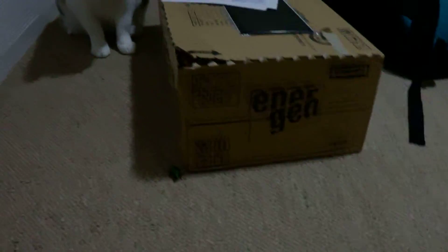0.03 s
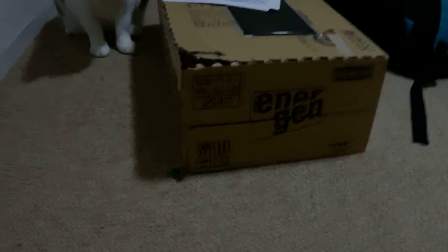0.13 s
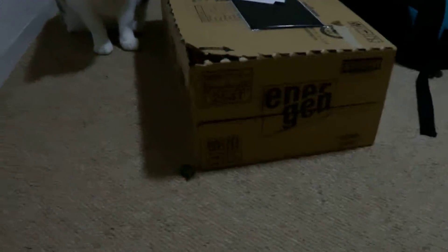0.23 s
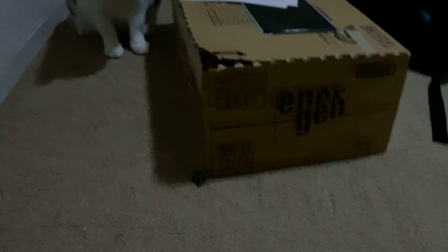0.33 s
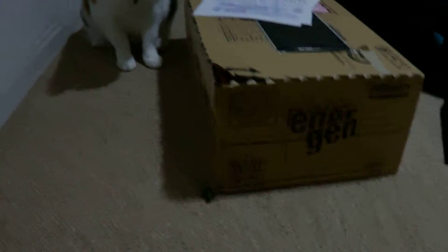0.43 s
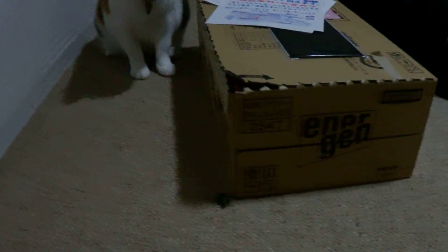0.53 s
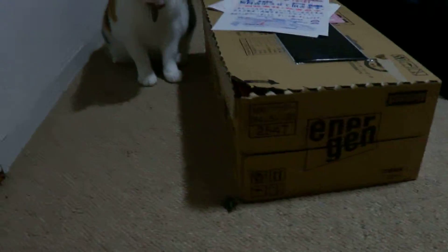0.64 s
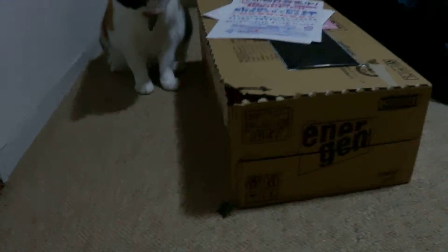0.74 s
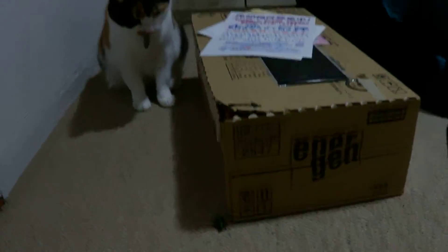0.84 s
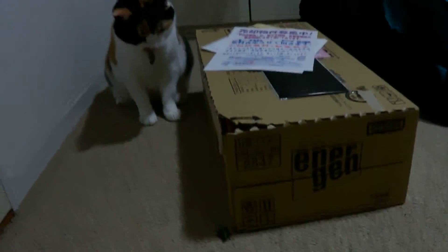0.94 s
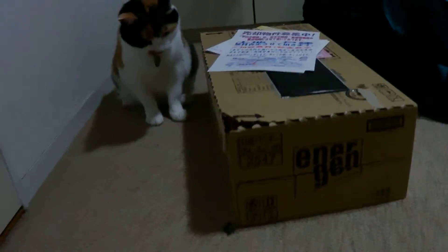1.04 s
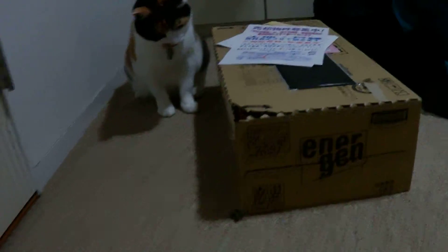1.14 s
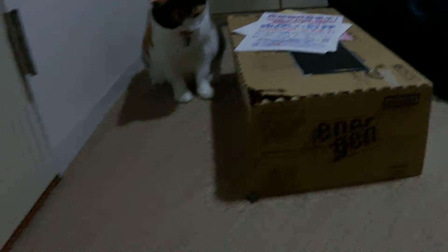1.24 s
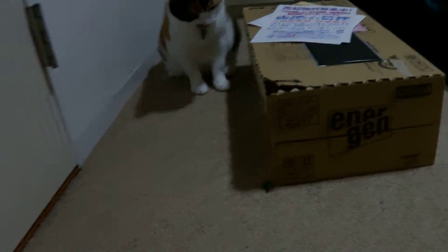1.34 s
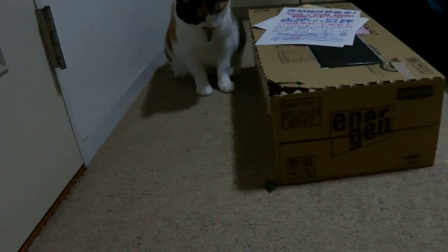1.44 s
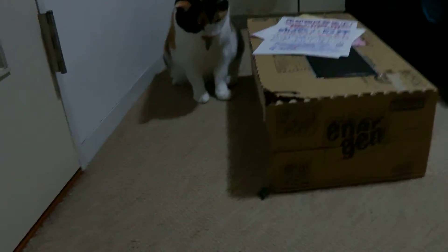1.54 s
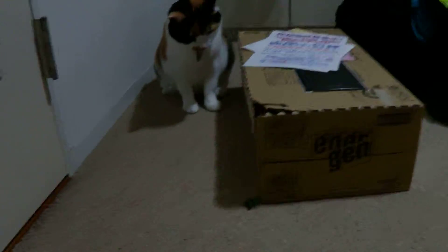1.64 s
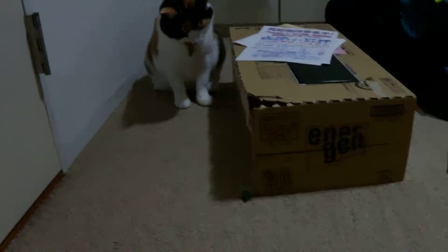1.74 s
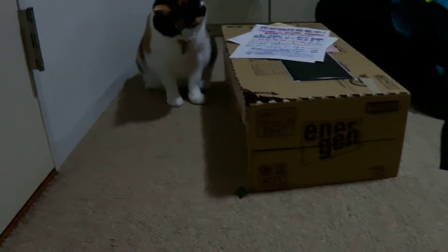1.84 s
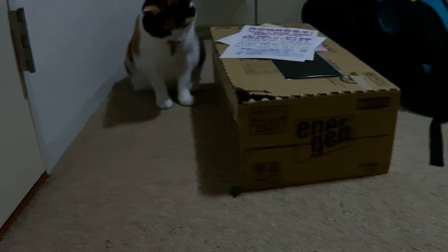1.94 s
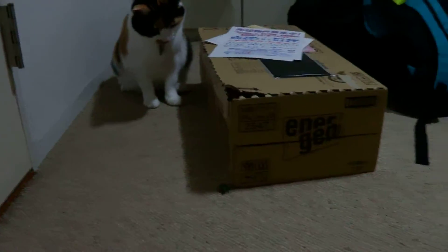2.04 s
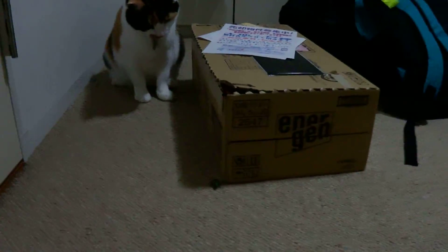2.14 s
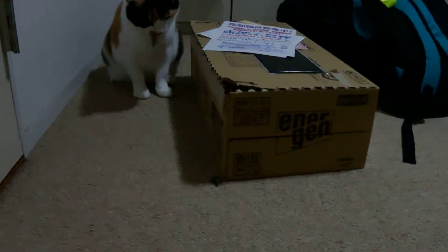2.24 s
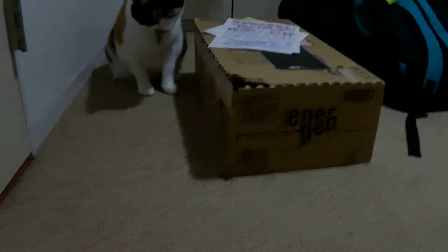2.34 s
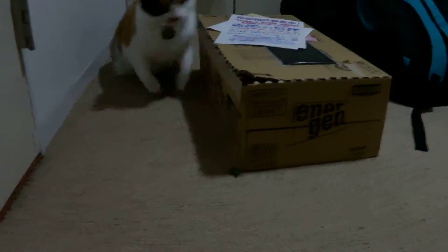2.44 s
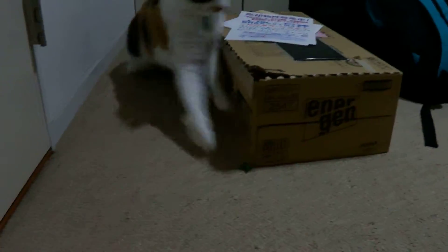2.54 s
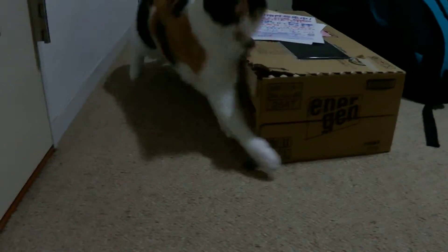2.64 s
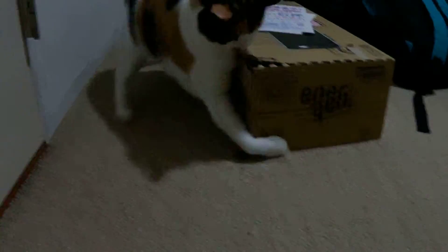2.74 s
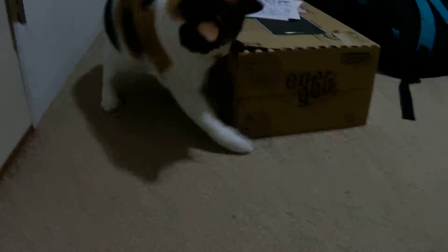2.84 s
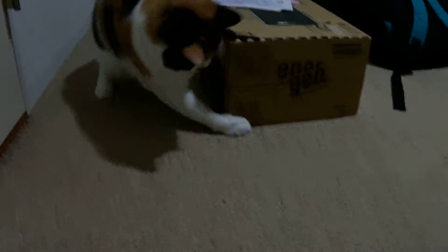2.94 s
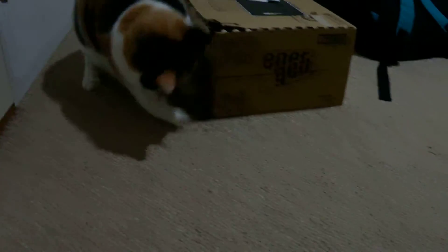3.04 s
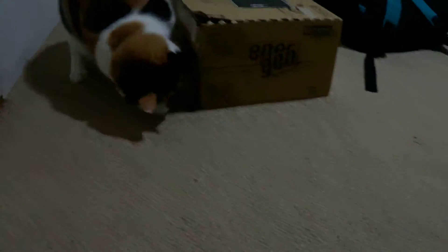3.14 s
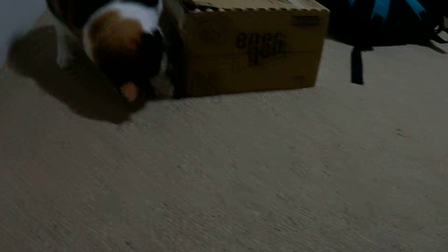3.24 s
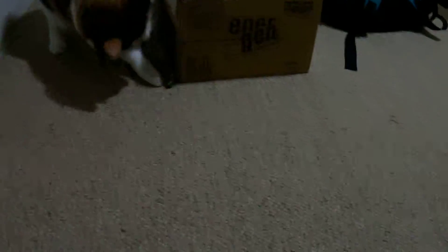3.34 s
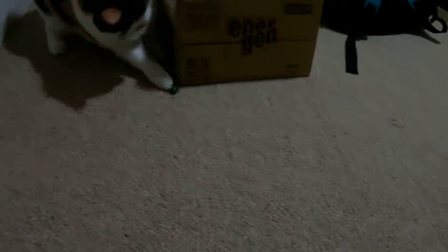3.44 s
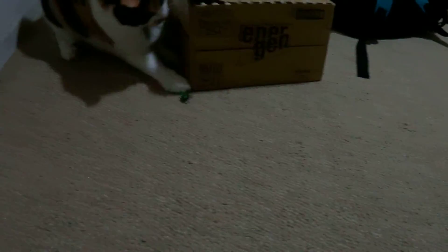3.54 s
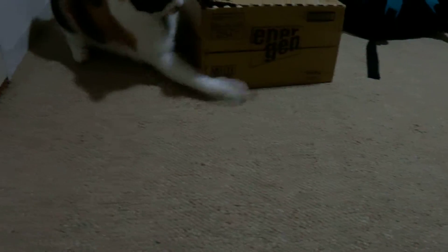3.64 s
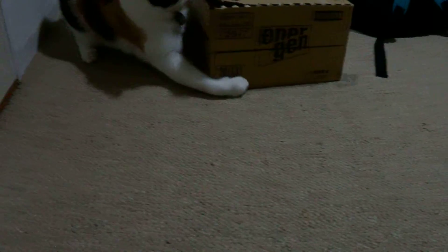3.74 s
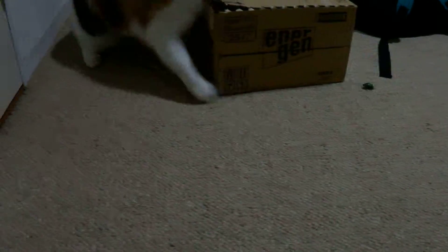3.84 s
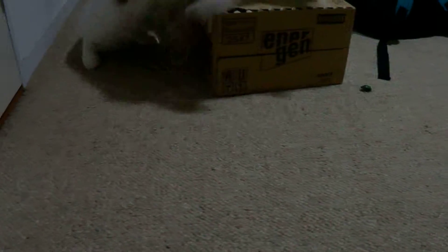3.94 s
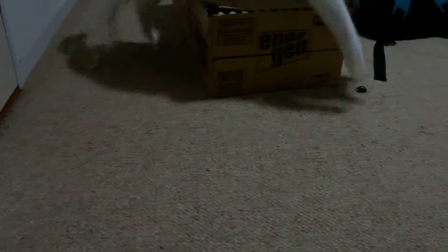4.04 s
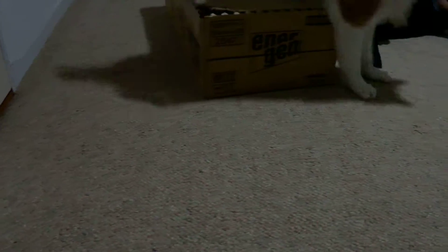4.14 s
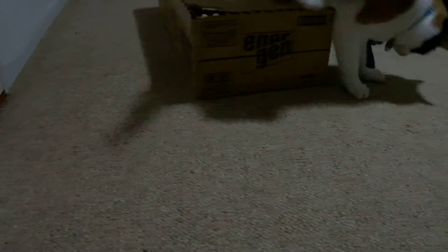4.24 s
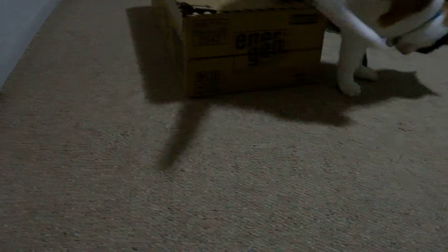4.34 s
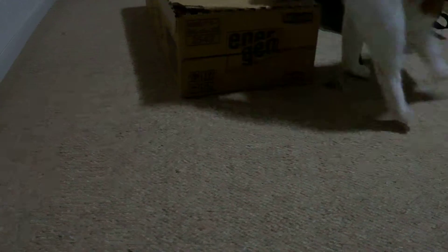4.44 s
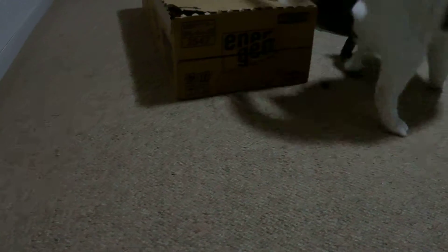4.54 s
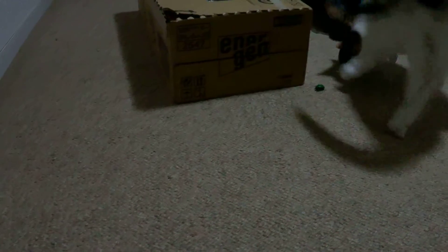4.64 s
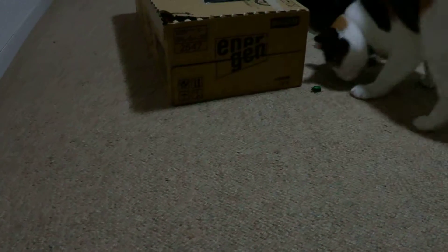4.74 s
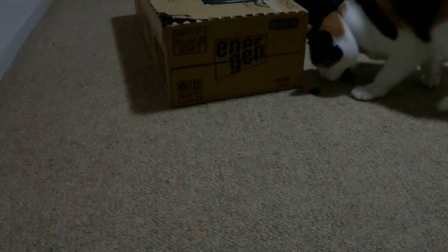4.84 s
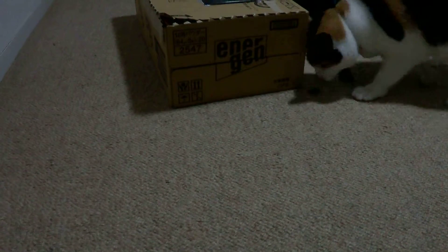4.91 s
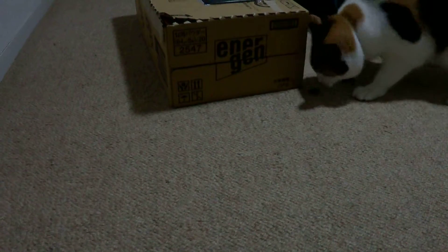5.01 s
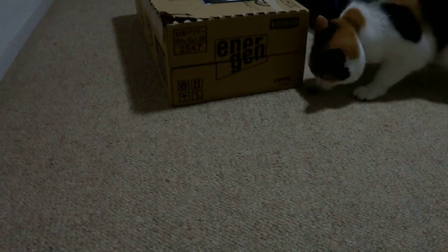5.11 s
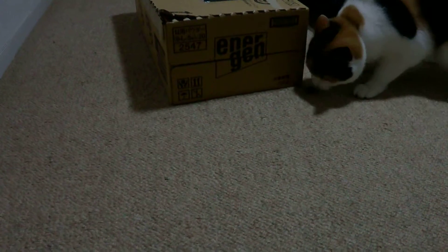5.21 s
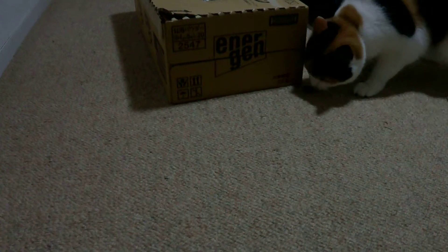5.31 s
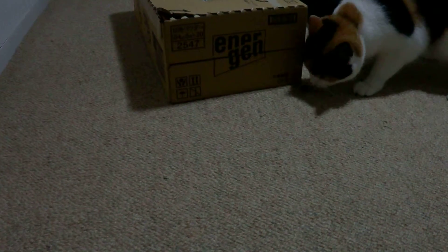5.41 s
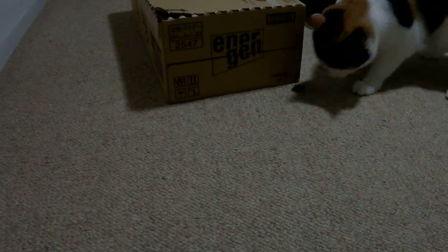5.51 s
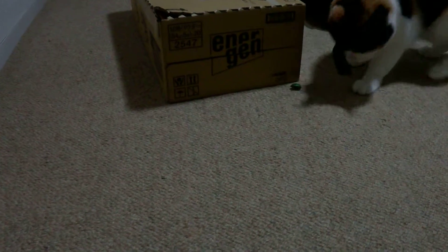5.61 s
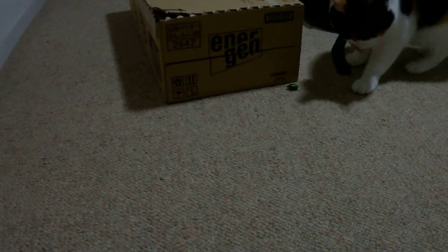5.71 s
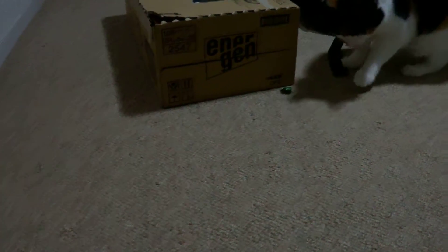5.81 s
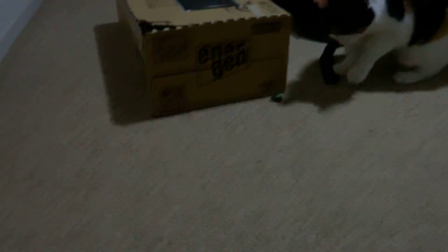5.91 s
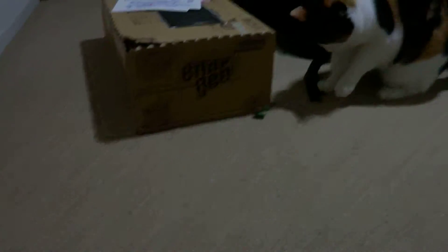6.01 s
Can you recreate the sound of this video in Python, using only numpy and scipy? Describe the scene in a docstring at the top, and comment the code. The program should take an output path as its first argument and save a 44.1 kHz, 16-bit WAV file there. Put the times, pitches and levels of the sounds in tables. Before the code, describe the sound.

A quiet, small carpeted room with low room tone and faint hiss. Sleeves rustle softly near the microphone, with two barely audible footfalls. Then a cat pounces: padded thuds, a flurry of hollow cardboard knocks, bright claw rips and a tiny collar tag tinkle. After a pause comes one loud boxy thump, then lighter scrambling, fading thuds and near silence. Close, dry stereo, with scratches leaning left.

```python
"""A quiet carpeted room at night, where a cat pounces after a small toy beside a cardboard box.
Paws thud on the floor and knock the hollow box: both are struck modes with a noisy shudder.
Claws rip the carpet in filtered noise grains and tick on card as noise snaps that ring; a collar tag tinkles.
Clothes and the cat's coat rustle in swells of noise, the clothes near the hand-held camera.
Shaped noise makes the low room tone and microphone hiss; steady sines make a faint whine and two low hums."""
import sys
import numpy as np
from scipy import signal
from scipy.fft import rfft, irfft
from scipy.io import wavfile
from scipy.ndimage import uniform_filter1d

SR = 44100
rng = np.random.default_rng(int(sys.argv[2]) if len(sys.argv) > 2 else 0)


def waveform_to_disk(signal):
    """Save audio, clipped to [-1, 1], as 16-bit WAV at the path in sys.argv[1]."""
    frames = np.transpose(np.atleast_2d(signal))
    scaled = np.clip(frames, -1, 1) * 32767
    samples = np.round(scaled).astype(np.int16)
    wavfile.write(sys.argv[1], SR, samples)


N = 267510
T = np.arange(N) / SR
RING = T[:SR // 3]  # time axis of one short sound, s

# Event levels are those of the dry sound, before panning and echo.
# Soft footfalls, the camera holder's two first and then the cat's:
# start_s, level_db (peak), pitch_hz (strongest), second_db (second foot against the first)
FOOTFALLS = [(1.528, -39.5, 194, -24), (1.756, -37.5, 151, -28), (2.67, -18, 128, -14),
             (2.76, -21.5, 165, -2.5), (2.833, -20, 85, -9), (3.701, -27, 137, -20),
             (3.755, -26, 101.4, -19), (4.209, -22.5, 97, -5.5), (4.555, -30, 119, -6),
             (4.586, -21.5, 134, -6.5), (4.764, -36.5, 139, -2.5), (4.950, -31, 138, -18),
             (5.006, -42.5, 134, 1.5)]
# Blows on the box: start_s, level_db (peak), pitch_hz (strongest)
BOX_BLOWS = [(2.510, -43, 480), (2.695, -24.5, 284), (2.702, -28, 500), (2.766, -26, 410),
             (2.796, -24.5, 557), (2.806, -18.5, 392), (2.833, -15.5, 191), (2.845, -14.5, 255),
             (2.844, -21.5, 843), (2.867, -27, 392), (2.987, -26, 274), (2.984, -28, 540),
             (3.739, -28.5, 267), (3.756, -9.5, 234), (3.757, -27.5, 380), (4.135, -39.5, 520),
             (4.192, -32.5, 273), (4.229, -25, 340), (4.245, -20.5, 415), (4.342, -26.5, 179),
             (4.351, -22, 342), (4.390, -35.5, 340), (4.536, -42, 556), (4.558, -40, 594),
             (4.759, -41, 487), (4.783, -39.5, 480)]
# Claws and toy ticking on card:
# start_s, level_db (snap peak, roughly), pitch_hz (card ring), ring_db (against the snap), snap_t60_ms
CARD_TICKS = [(2.701, -27, 1700, -6.5, 23), (2.7992, -25, 8750, 1, 7.3), (2.842, -33, 1120, 6, 21),
              (2.8555, -30, 3000, -9, 7.1), (2.984, -22, 1480, 2, 18), (3.756, -29.5, 1050, 7.5, 19),
              (3.7934, -27.5, 760, 7.5, 11), (3.7928, -30.5, 1830, 11.5, 19), (4.229, -25, 4070, -11, 28),
              (4.3415, -38.5, 9300, 16.5, 11), (4.762, -55, 700, 6, 6), (4.786, -53.5, 700, 8, 6.6)]
# Claws dragged through the carpet:
# start_s, level_db (rms of the rip at its height), rise_ms, fade_t60_ms, rub_db (dull pile rub against the rip)
CARPET_SCUFFS = [(2.651, -39, 0.62, 62, -3), (2.679, -46.5, 5.1, 315, 4.5), (2.793, -49.5, 7.9, 400, 3.5),
                 (2.990, -58.5, 4.2, 100, 12.5), (3.800, -55.5, 5, 600, -5), (3.846, -46.5, 16, 350, 3.5),
                 (3.931, -45.5, 3.4, 65, -1.5), (4.188, -41, 5.5, 164, -4), (4.228, -46, 3.8, 124, 4.5),
                 (4.340, -39, 8.4, 130, -2.5), (4.547, -54, 6.8, 170, -6), (4.599, -48.5, 5, 51, -10)]
# Taps of the collar tag: start_s, level_db (peak), pitch_hz (strongest)
TAG_TAPS = [(2.65, -34, 7830), (2.655, -26, 8400), (3.253, -46.5, 10800), (4.051, -47, 8600),
            (4.081, -43, 12400), (4.148, -41.5, 11100)]

# Resonances of floor, box, metal tag and stiff card under a hard tip: pitch_hz, level_db (relative), t60_s
FLOOR_MODES = [(80, -29, .06), (101.2, 4.5, 0.129), (134.2, 11, 0.096), (146, -2, 0.5), (172, -3, 0.02),
               (188, 11, 0.13), (225, 2, 0.42), (340, -1, .03)]
BOX_MODES = [(167, -5, 0.1), (190, 11, 0.09), (234.2, 10, 0.097), (327.7, 2.5, 0.12), (351.6, 6, 0.083),
             (426, -10, 0.094), (485, 0, 0.06), (581, 2, 0.12), (690, -25, 0.078), (711, -2, 0.13),
             (800, 12.5, 0.029), (890, 23, 0.0093), (1060, 15, 0.045)]
TAG_MODES = [(7830, -5, 0.021), (8400, -25, .04), (8650, -14, 0.067), (9000, -30, .03), (13160, -18, 0.036)]
CARD_MODES = [(826, 9.5, 0.024), (1065, 15.5, 0.012), (1440, 8, 0.014), (1820, 5.5, 0.013),
              (2380, 3.5, 0.0094), (4320, -20, 0.016), (5240, 0, 0.0037), (7640, -17, 0.0061),
              (8900, -2, 0.0029), (9540, -8, 0.009)]

# Single rubs of the holder's sleeves: middle_s, level_db (relative to the other rubs), length_s
SLEEVE_RUBS = [(.345, -51.5, 0.18), (.95, -61.5, 0.42), (1.38, -71, 0.23), (1.53, -55.5, 0.1),
               (1.712, -60.5, 0.089)]
# Single brushes of the cat's coat: middle_s, level_db (relative to the other brushes), length_s
COAT_BRUSHES = [(2.525, -57.5, 0.083), (3.48, -63, .28), (3.73, -55.5, 0.094), (4.97, -55.5, .09),
                (5.68, -61.5, 0.057)]

# Noise spectra of rubbing cloth, ripping claws, rubbed pile, a snap on card and the room:
# frequency_hz, level_db (relative, per Hz)
CLOTH_SPECTRUM = [(40, -15), (160, 4.5), (380, -5), (700, -11), (1100, -19.5), (2200, -18.5), (3600, -25),
                  (8000, -14), (12000, -22), (16000, -30)]
CLAW_SPECTRUM = [(1000, -31), (3500, -32), (5500, -7), (7300, 0), (8500, 1.5), (10500, -3.5), (13000, -12),
                 (16000, -28)]
PILE_SPECTRUM = [(25, -22), (90, 2), (250, -1), (550, -7), (1100, -13.5), (2200, -14.5), (4000, -17.5),
                 (7000, -13.5), (14000, -73)]
SNAP_SPECTRUM = [(100, -33), (400, 2), (900, 2.5), (2200, 3), (3300, -6.5), (4500, 6), (6000, 4), (8500, 7),
                 (12000, -2), (16000, -24)]
ROOM_SPECTRUM = [(12, -54), (20, -11), (92, -1), (148, -3.5), (175, -6), (245, -7.5), (315, -10.5),
                 (549, -16), (597, -18), (705, -20.5), (1200, -28.5), (3080, -40), (3750, -50.5),
                 (6910, -28.5), (15500, -25)]
# Tone of the room's echo: frequency_hz, level_db (relative)
ECHO_SPECTRUM = [(50, 3), (200, -1.5), (500, 1.5), (900, -3.5), (1500, -3), (4000, 0), (8500, -2.5),
                 (16000, 2)]
# Steady tones of household electrics: pitch_hz, level_db (rms)
ELECTRIC_TONES = [(48.4, -89), (96.9, -84), (15735, -76)]

ROOM_TONE_DB = -53  # rms
TOP_HZ = 15950
SECOND_FOOT_S, SECOND_FOOT_HZ = 0.038, 149.5  # delay after the first foot, and pitch
PUSH_CYCLES = 1.16  # a soft foot pushes for about one swing of the floor
# Contact time of a blow of this strength; it halves for each HALVING_DB harder.
CONTACT_MS, CONTACT_AT_DB, HALVING_DB = 1.99, -10, 16.5
# Faint rubbing until the holder stands still.
SLEEVE_REST_DB, HOLDER_STILL_S = -67.5, 3.66
# The coat brushes all through the chase, easing in and out.
CHASE_START_S, CHASE_END_S, CHASE_EASE_S, CHASE_DB = 2.45, 4.97, 0.38, -58


def undb(db):
    """Turn decibels into gain."""
    return 10 ** (np.asarray(db) / 20)


def unit(x):
    """Scale to rms 1."""
    return x / np.sqrt(np.mean(x ** 2))


def add(track, start_s, sound):
    """Mix a sound into a track at its start time."""
    i = int(start_s * SR)
    track[..., i:i + sound.shape[-1]] += sound[..., :N - i]


def colour(x, spectrum):
    """Filter by a spectrum, joining its points on a log frequency scale."""
    hz, db = np.transpose(spectrum)
    f = np.fft.rfftfreq(x.shape[-1], 1 / SR)
    gain = undb(np.interp(np.log(f + 1), np.log(hz), db))
    return irfft(rfft(x) * gain, x.shape[-1])


def diffuse(size, apart_hz):
    """Noise from all round: alike at both microphones in the bass, unrelated well above apart_hz."""
    mid, side = rfft(rng.standard_normal((2, size)))
    alike = 1 / (1 + (np.fft.rfftfreq(size, 1 / SR) / apart_hz) ** 2)
    mid = mid * np.sqrt(1 + alike)
    side = side * np.sqrt(1 - alike)
    return unit(irfft(np.array([mid + side, mid - side]), size))


def pan(x, left_db):
    """Place a sound between the microphones, the left louder than the right by left_db."""
    return x * undb(np.array([[left_db], [-left_db]]) / 2)


def attack(rise_ms):
    """Straight rise from silence to full level."""
    return np.minimum(RING * 1000 / rise_ms, 1)


def decay(t60_s):
    """Exponential decay, 60 dB in t60_s."""
    return undb(-60 * RING / t60_s)


def ring(modes, hz, rise_ms, focus_db):
    """One blow, peak 1: the spot that is hit favours modes near hz, the others lose focus_db an octave."""
    f, db, t60_s = np.transpose(modes)[:, :, None]
    weight = undb(db - focus_db * np.abs(np.log2(f / hz)))
    # all modes are in step at the end of the push
    swings = np.sin(2 * np.pi * f * (RING - rise_ms * 1e-3))
    sound = np.sum(weight * swings * decay(t60_s), axis=0)
    # the push builds smoothly
    sound *= np.sin(np.pi / 2 * attack(rise_ms)) ** 2
    return sound / np.abs(sound).max()


def blows(rows, modes, focus_db, shudder_db, shudder_t60):
    """Every blow on one object: its modes ring, and a noisy shudder spreads around the same pitch."""
    out = np.zeros(N)
    for start_s, db, hz, rise_ms in rows:
        edges_hz = [hz * 0.7, min(hz * 1.5, SR / 2 - 1000)]
        band = signal.butter(2, edges_hz, "band", fs=SR, output="sos")
        shudder = unit(signal.sosfilt(band, rng.standard_normal(len(RING))))
        shudder *= attack(rise_ms) * decay(shudder_t60)
        blow = ring(modes, hz, rise_ms, focus_db) + undb(shudder_db) * shudder
        add(out, start_s, undb(db) * blow)
    return out


def swells(rows):
    """Each rub gathers speed and slows again in one bell-shaped swell."""
    return sum(undb(db) * np.exp(-(2 * (T - middle_s) / length_s) ** 2) for middle_s, db, length_s in rows)


def room(x, wet_db, t60=0.26, gap_s=0.0029):
    """Walls close by return a short diffuse tail after a small gap."""
    tail = diffuse(len(RING), apart_hz=1270) * decay(t60)
    tail *= np.clip(RING / gap_s - 1, 0, 1)
    energy = np.sum(tail ** 2) / 2  # of one channel
    tail = colour(tail / np.sqrt(energy), ECHO_SPECTRUM)
    return undb(wet_db) * signal.fftconvolve(x[None], tail, axes=1)[:, :N]


def background():
    """Shaped diffuse noise for low room noise and microphone hiss, with faint electrical sine tones."""
    air = unit(colour(diffuse(N, apart_hz=417), ROOM_SPECTRUM))
    tones = sum(undb(db) * np.sqrt(2) * np.sin(2 * np.pi * hz * T) for hz, db in ELECTRIC_TONES)
    return undb(ROOM_TONE_DB) * air + tones


def sleeve_force():
    """Sleeves shift in single rubs over a faint rubbing that dies away over its last second."""
    rest = undb(SLEEVE_REST_DB) * np.clip(HOLDER_STILL_S - T, 0, 1)
    return undb(7) * swells(SLEEVE_RUBS) + rest


def coat_force():
    """The coat brushes along box and carpet, steadily in the chase and in single swells."""
    chase = np.clip(np.minimum(T - CHASE_START_S, CHASE_END_S - T) / CHASE_EASE_S, 0, 1)
    return undb(2) * swells(COAT_BRUSHES) + undb(CHASE_DB) * chase


def rustle():
    """Sleeves and coat rub with a force that keeps catching slightly, heard as soft cloth noise."""
    wander = unit(uniform_filter1d(rng.standard_normal(N), size=250))
    catching = undb(1.2 * wander)
    cloth = unit(colour(diffuse(N, apart_hz=1500), CLOTH_SPECTRUM))
    return (sleeve_force() + coat_force()) * catching * cloth


def footfalls():
    """Feet land in pairs, the second usually lighter and just after the first; the floor modes ring."""
    second_rise_ms = 1000 * PUSH_CYCLES / SECOND_FOOT_HZ
    rows = []
    for start_s, db, hz, second_db in FOOTFALLS:
        rows.append((start_s, db, hz, 1000 * PUSH_CYCLES / hz))
        rows.append((start_s + SECOND_FOOT_S, db + second_db, SECOND_FOOT_HZ, second_rise_ms))
    return blows(rows, FLOOR_MODES, focus_db=22, shudder_db=-10, shudder_t60=0.1)


def knocks():
    """The hollow box rings under each hit: the harder the cat hits it, the shorter the contact."""
    rows = []
    for start_s, db, hz in BOX_BLOWS:
        contact_ms = CONTACT_MS * 2 ** ((CONTACT_AT_DB - db) / HALVING_DB)
        rows.append((start_s, db, hz, contact_ms))
    return blows(rows, BOX_MODES, focus_db=32, shudder_db=-18, shudder_t60=0.14)


def thumps(low_hz=45):
    """Floor and box together; neither radiates the deepest bass."""
    bass_cut = signal.butter(2, low_hz, "high", fs=SR, output="sos")
    return signal.sosfiltfilt(bass_cut, footfalls() + knocks())


def tag():
    """The small metal tag taps its ring as the cat moves, and its high modes ring briefly."""
    rows = [(start_s, db, hz, 0.3) for start_s, db, hz in TAG_TAPS]
    return blows(rows, TAG_MODES, focus_db=40, shudder_db=-18, shudder_t60=0.037)


def fibres(rate):
    """Countless fibres letting go at random, rate a second."""
    return rng.standard_normal(N) * (rng.random(N) < rate / SR)


def scuffs():
    """Claws catch the carpet loops in a bright rip while the pad rubs the pile."""
    rip_force, rub_force = np.zeros(N), np.zeros(N)
    ms = RING * 1000
    for start_s, db, rise_ms, fade_ms, rub_db in CARPET_SCUFFS:
        fade = undb(db - 60 * np.maximum(ms - rise_ms, 0) / fade_ms)
        stroke = attack(rise_ms) * fade
        add(rip_force, start_s, stroke)
        add(rub_force, start_s, stroke * undb(rub_db))
    rip = rip_force * unit(colour(fibres(rate=14000), CLAW_SPECTRUM))
    rub = rub_force * unit(colour(fibres(rate=6000), PILE_SPECTRUM))
    return rip, rub


def ticks():
    """A hard tip snaps on card in a noise burst, and the card rings for a few milliseconds."""
    out = np.zeros(N)
    for start_s, db, hz, ring_db, t60_ms in CARD_TICKS:
        noise = unit(colour(rng.standard_normal(len(RING)), SNAP_SPECTRUM))
        snap = noise * decay(t60_ms / 1000) / 2  # halved so its peaks come near 1
        card = ring(CARD_MODES, hz, rise_ms=0.23, focus_db=15.0)
        add(out, start_s, undb(db) * (snap + undb(ring_db) * card))
    return out


def scene():
    """Mix all layers; the brightest sounds reach the left microphone more strongly."""
    rip, rub = scuffs()
    dull = thumps()
    sharp = ticks()
    bright = rip + tag()
    direct = pan(dull, left_db=1.75) + pan(sharp + rub, left_db=3.0) + pan(bright, left_db=10.0)
    echo = room(dull, wet_db=-4.0) + room(sharp, wet_db=-4.5) + room(bright + rub, wet_db=2.0)
    return direct + echo + pan(rustle(), left_db=1.4) + background()


def record(dry):
    """The camera cuts the top with a steep low-pass."""
    top_cut = signal.ellip(10, 0.05, 60, TOP_HZ, fs=SR, output="sos")
    return signal.sosfiltfilt(top_cut, dry)


dry = scene()
out = record(dry)
waveform_to_disk(out)
```